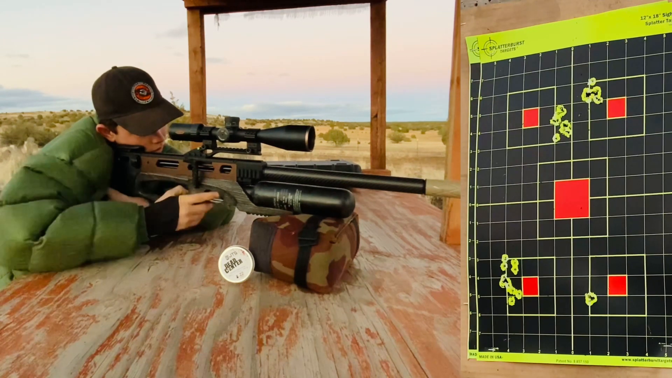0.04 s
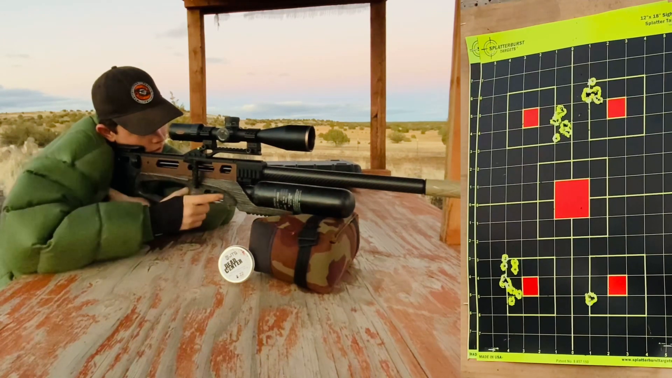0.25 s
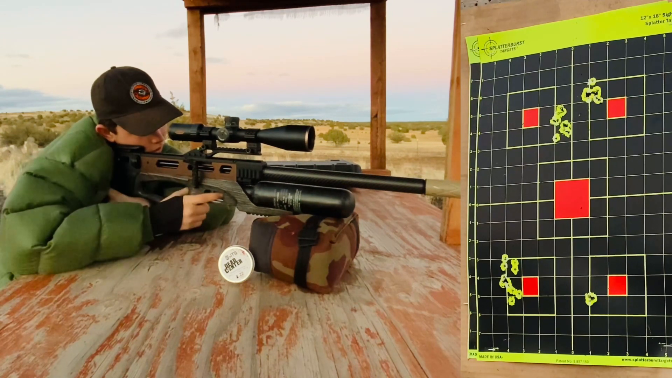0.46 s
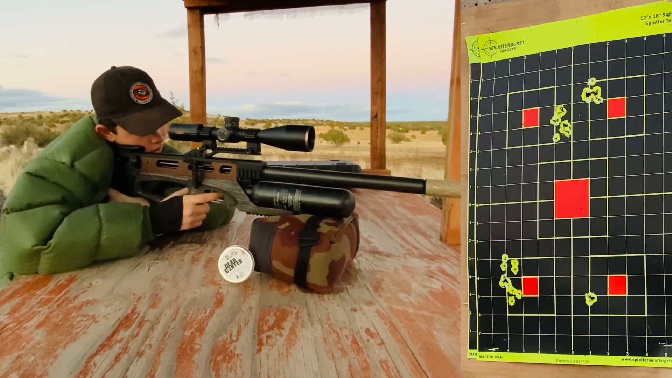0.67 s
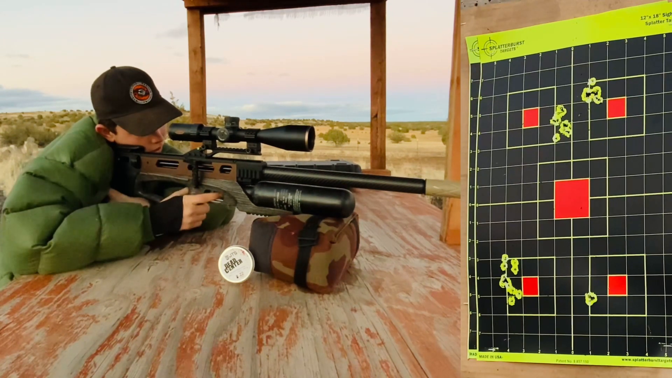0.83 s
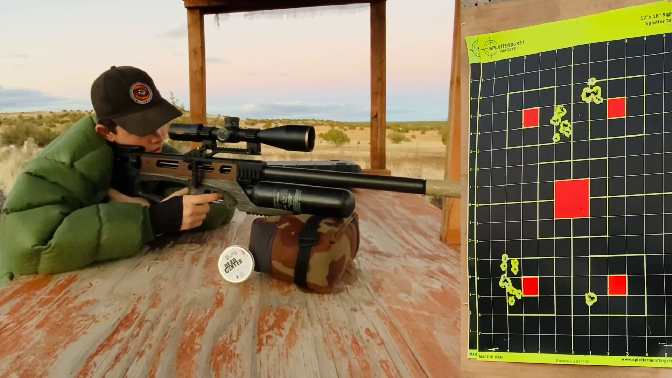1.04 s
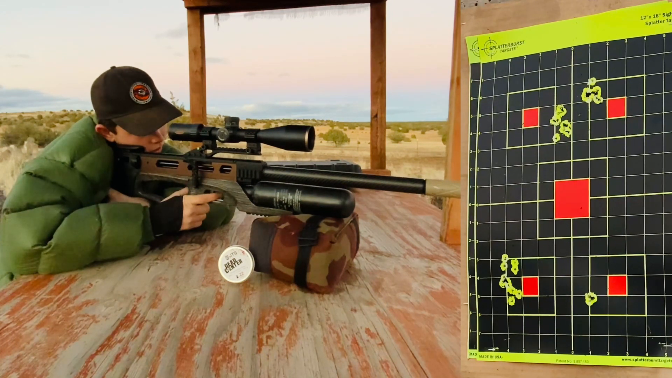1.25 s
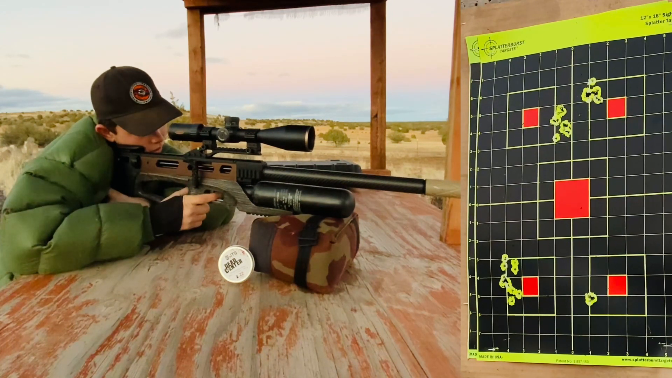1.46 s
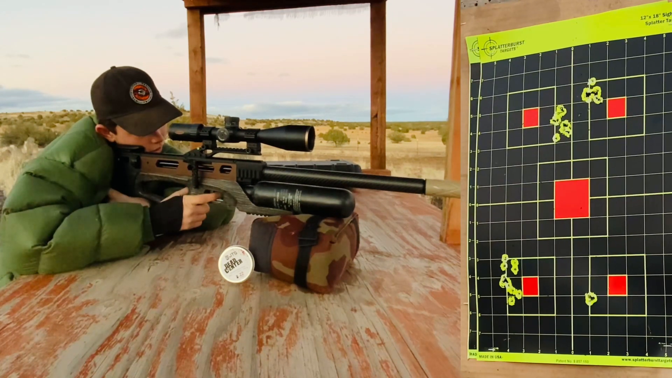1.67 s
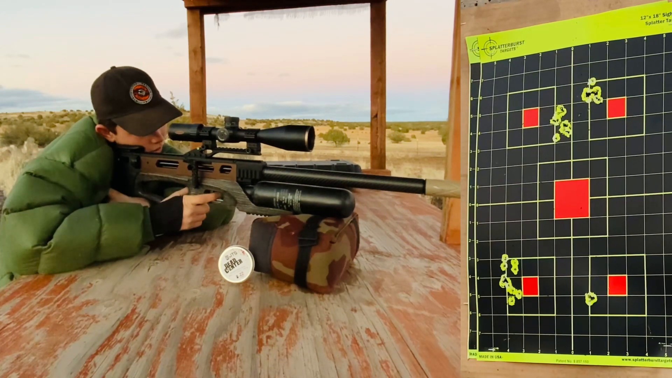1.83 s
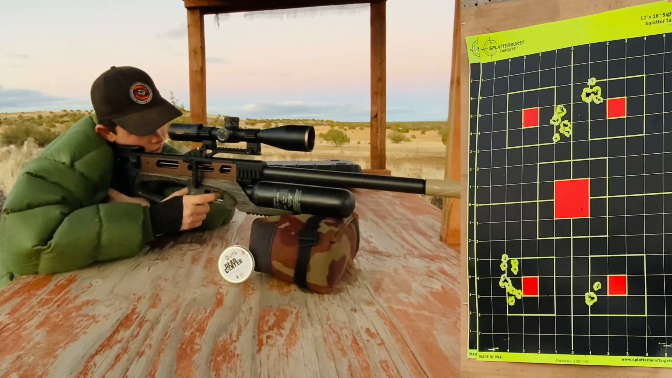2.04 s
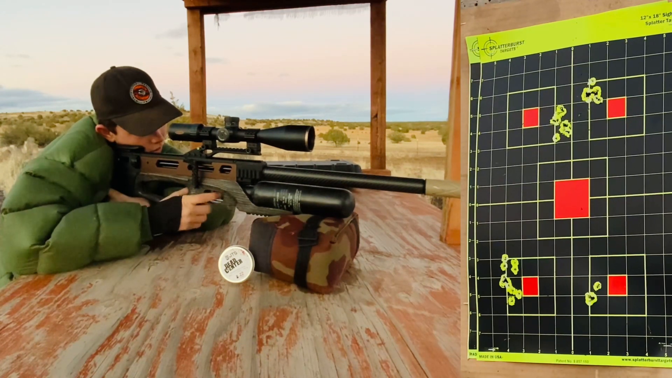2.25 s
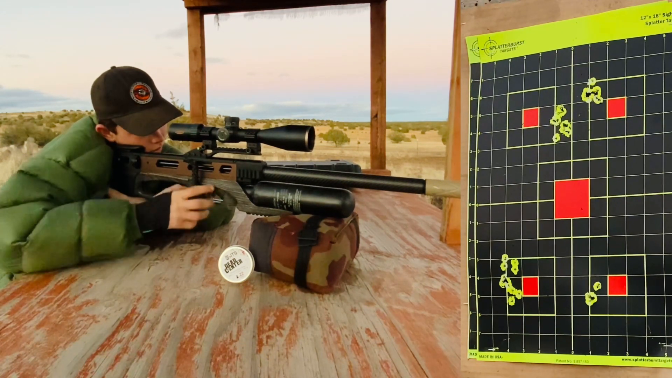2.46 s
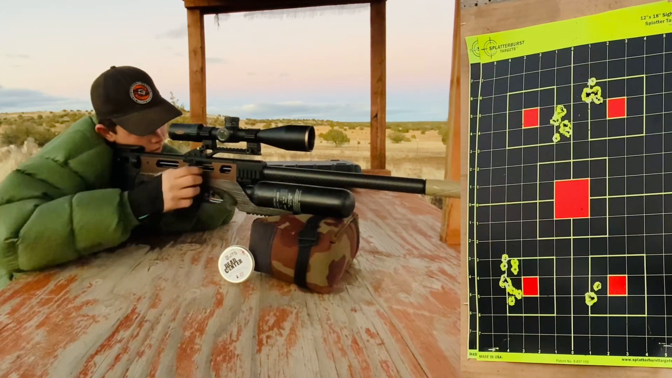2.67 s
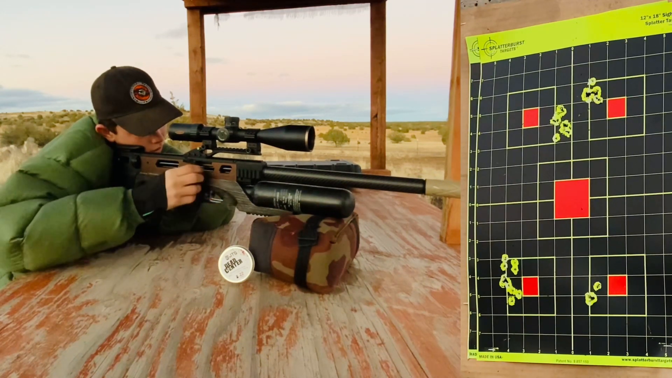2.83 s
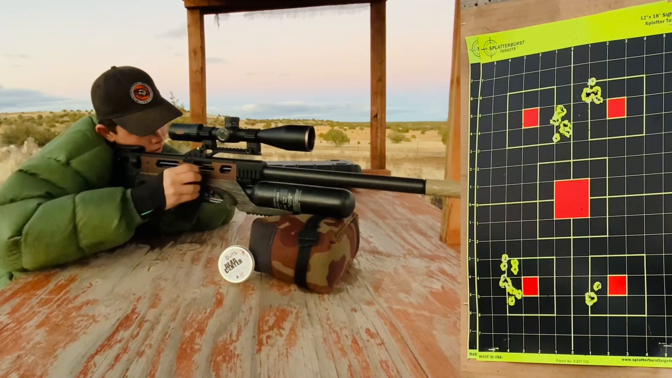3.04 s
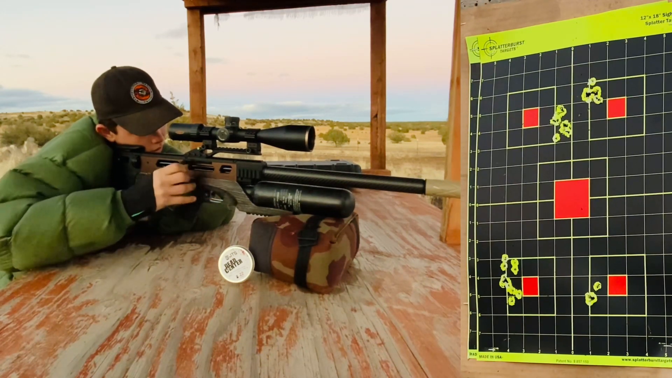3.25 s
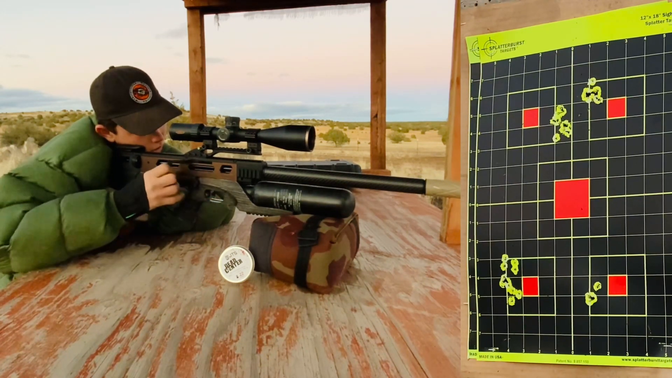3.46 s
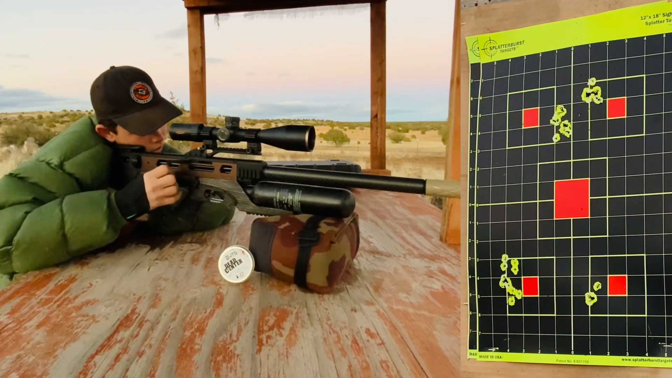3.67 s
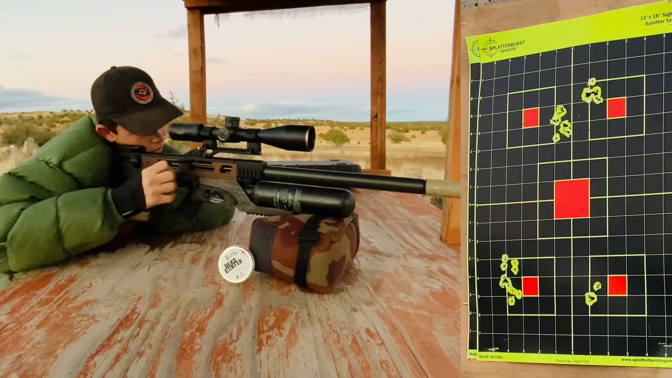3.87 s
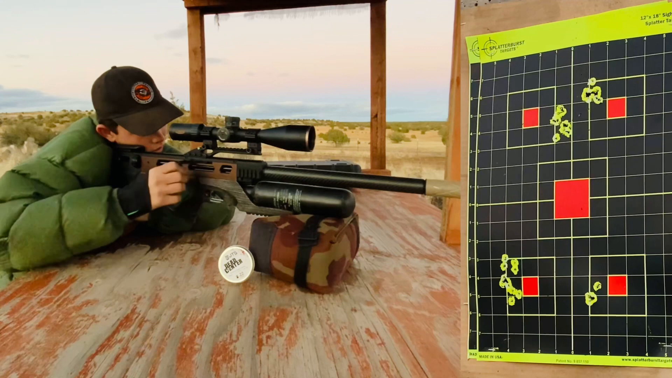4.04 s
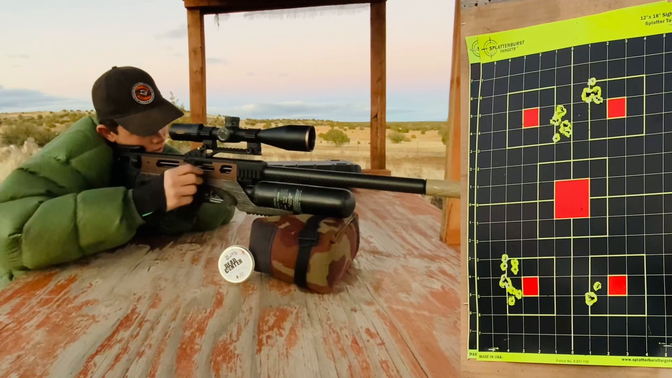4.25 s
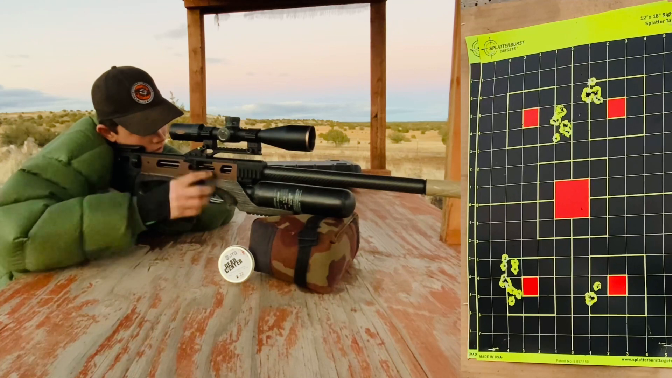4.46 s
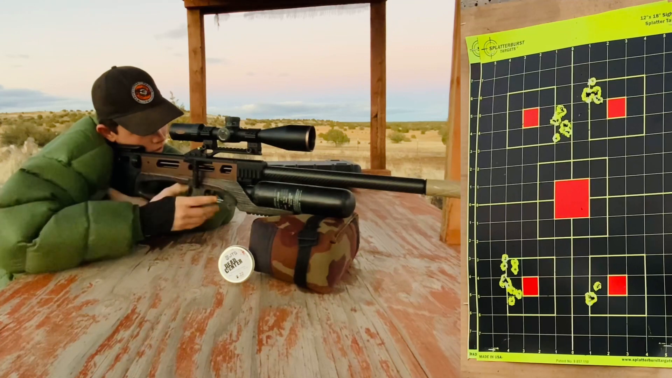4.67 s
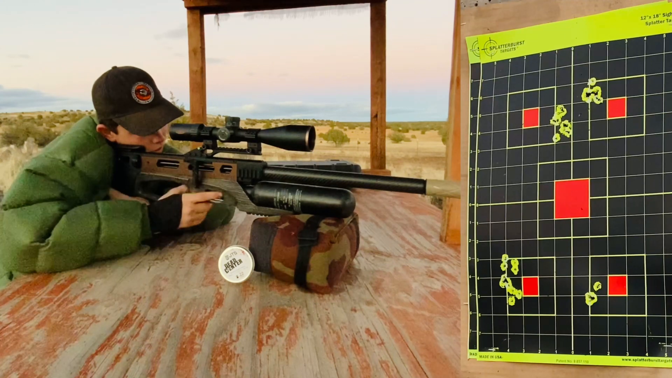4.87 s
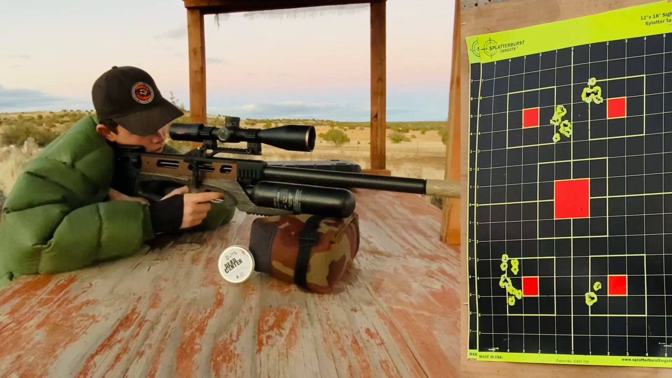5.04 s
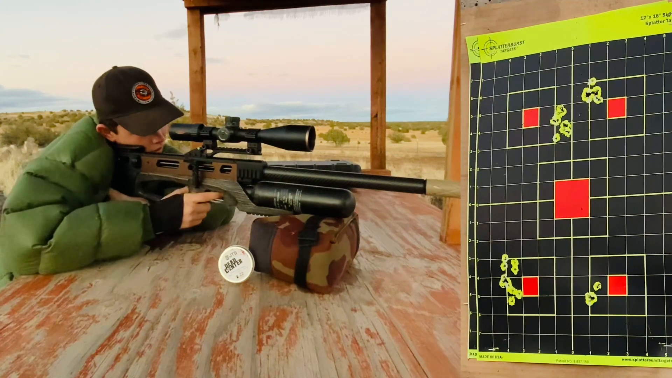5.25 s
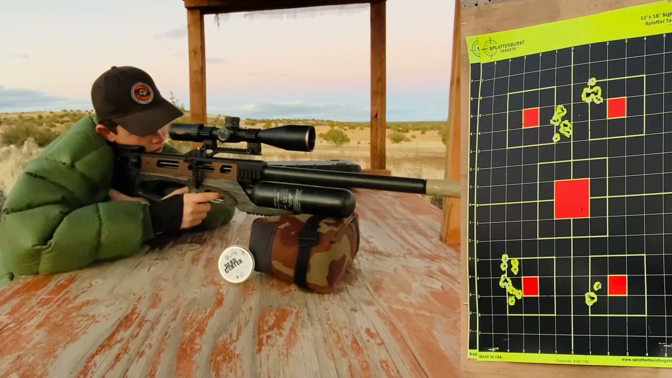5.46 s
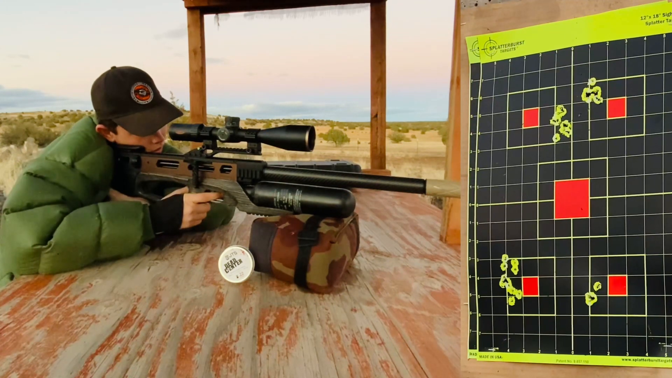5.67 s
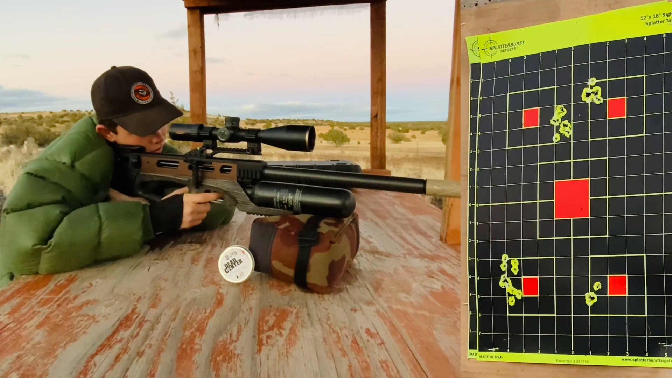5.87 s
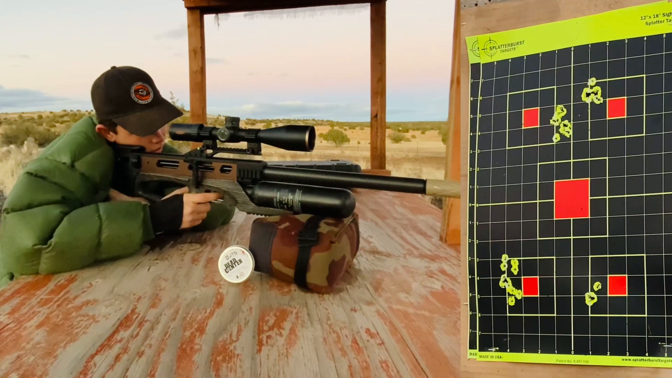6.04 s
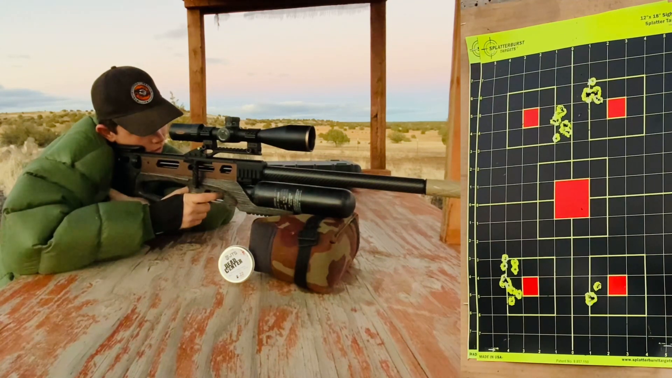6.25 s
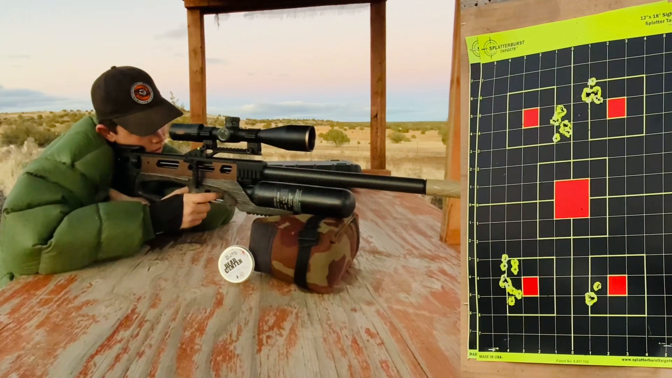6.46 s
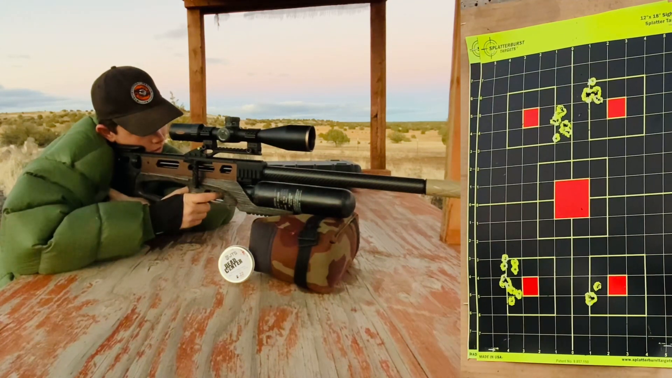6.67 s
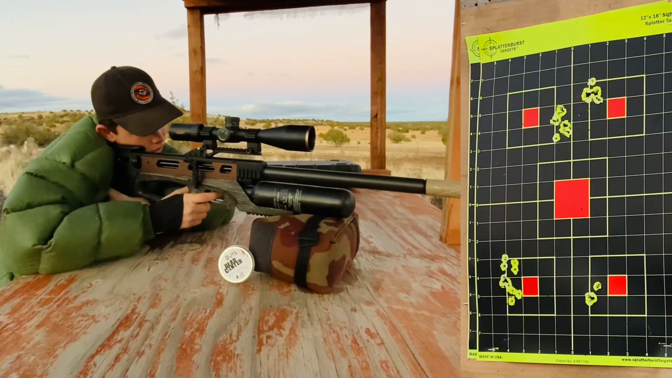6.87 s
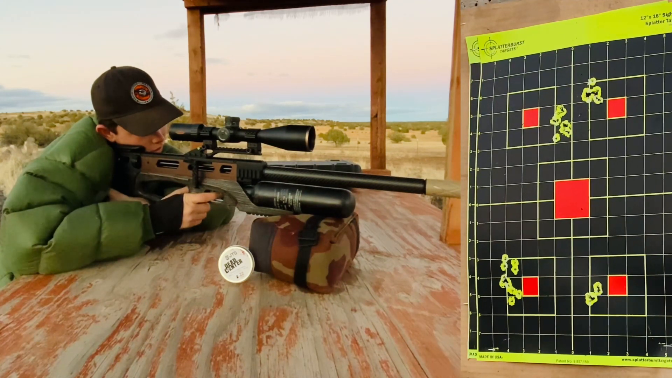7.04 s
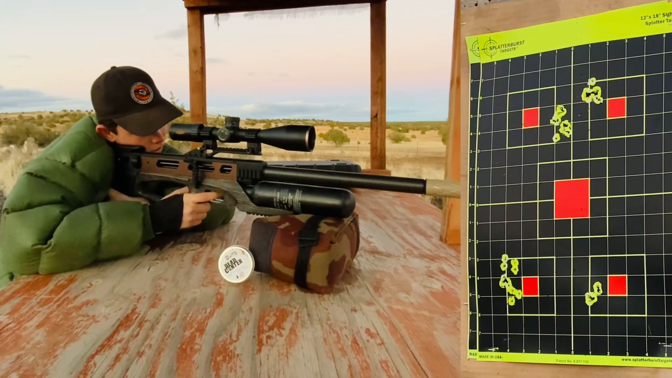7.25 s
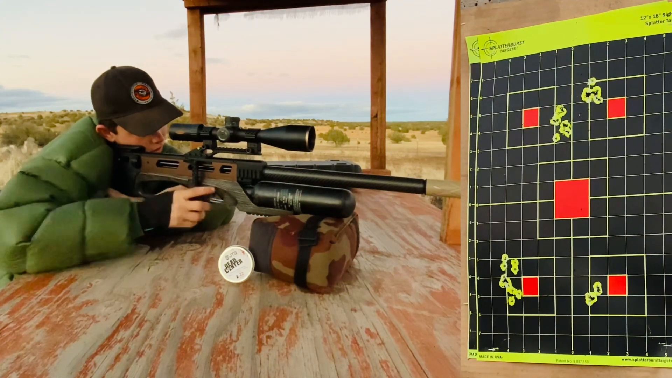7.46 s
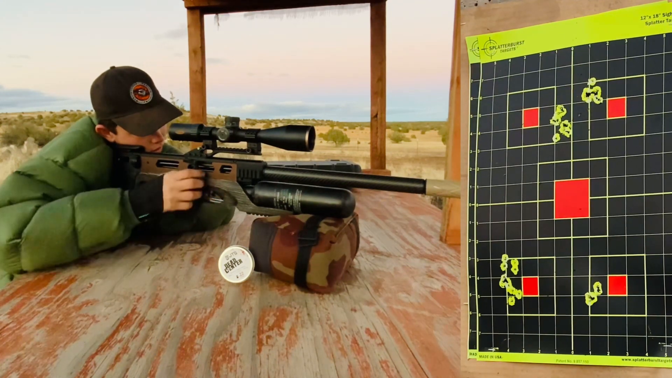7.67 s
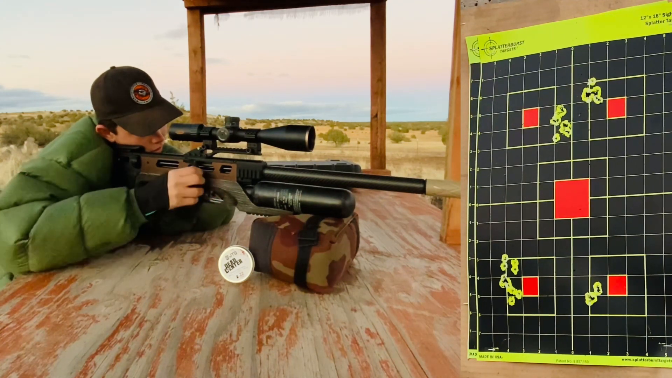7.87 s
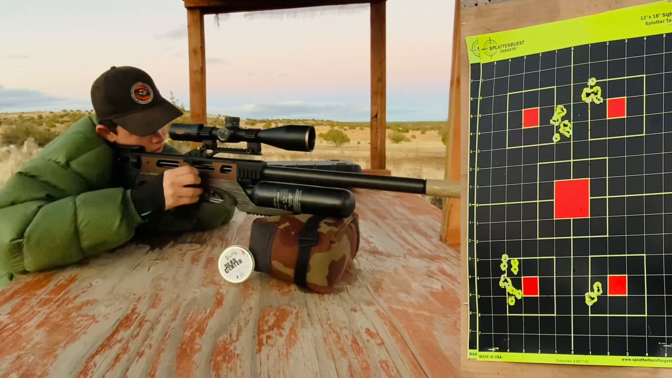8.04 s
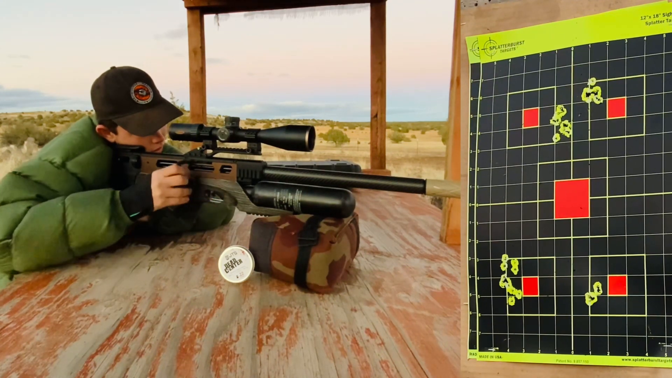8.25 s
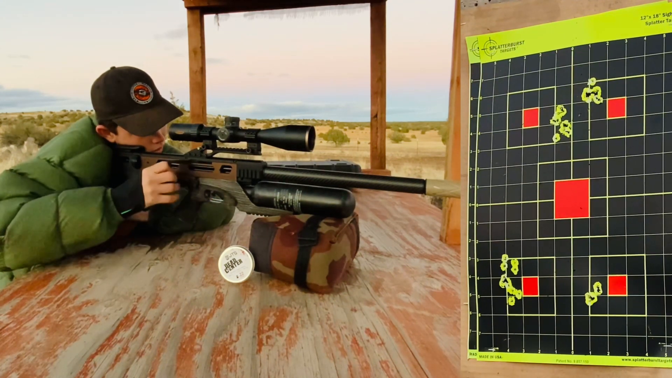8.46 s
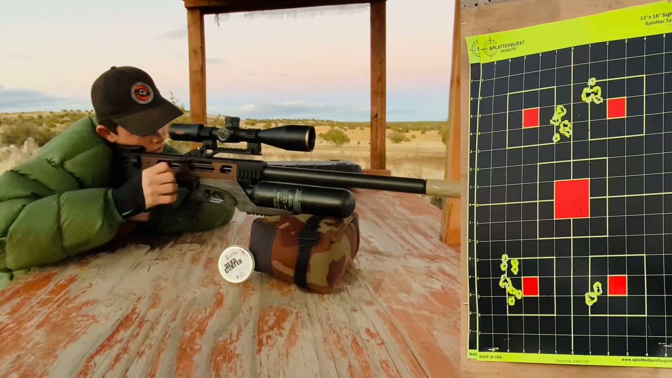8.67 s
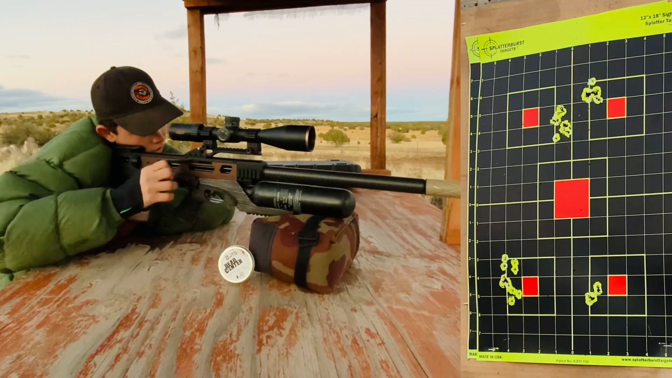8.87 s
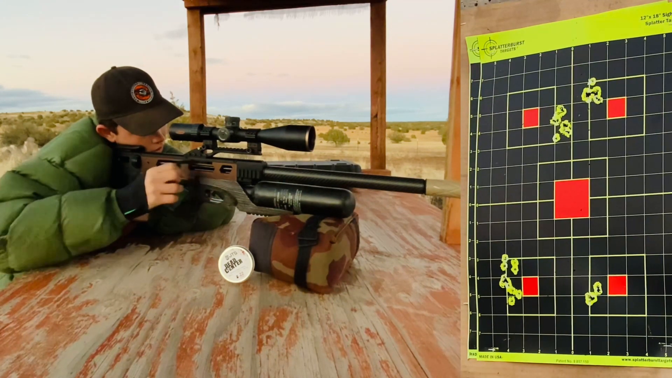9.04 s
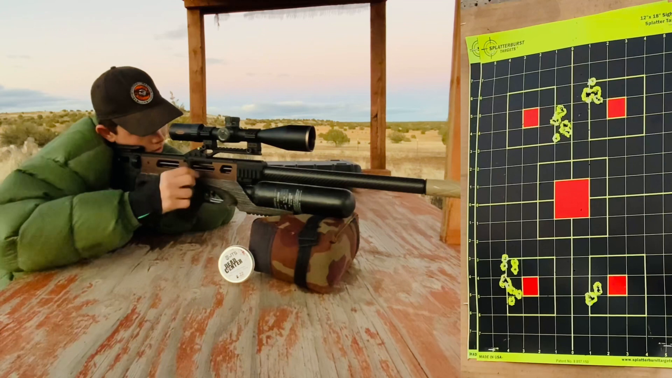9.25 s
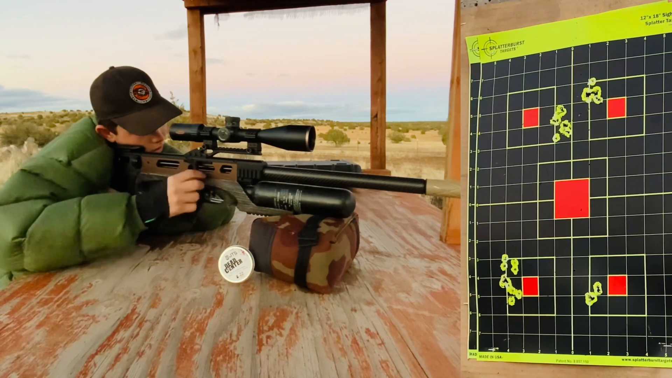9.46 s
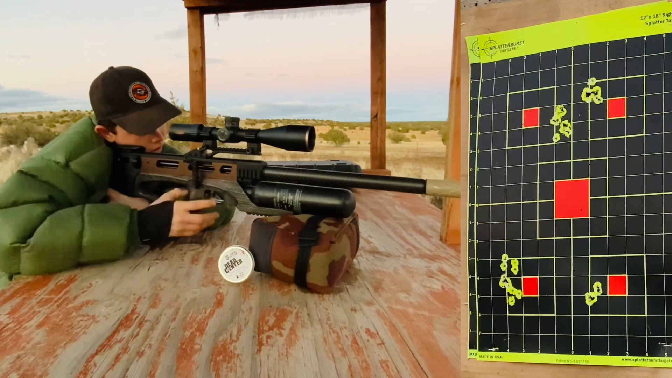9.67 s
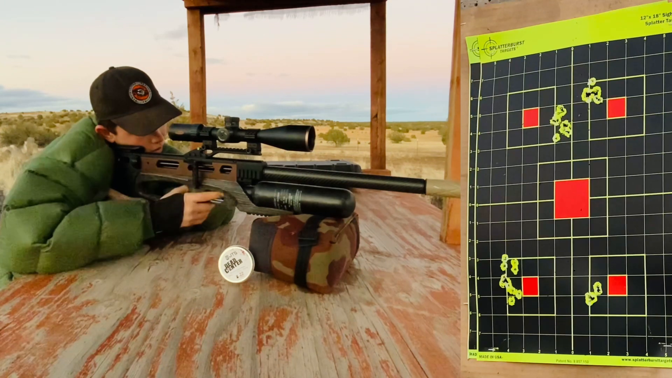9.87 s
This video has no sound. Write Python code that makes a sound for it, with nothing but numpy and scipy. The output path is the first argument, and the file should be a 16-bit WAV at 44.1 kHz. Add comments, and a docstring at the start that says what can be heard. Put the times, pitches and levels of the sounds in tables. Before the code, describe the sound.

Two sharp, suppressed air rifle shots outdoors, each followed by a pellet smacking a ringing target, then steel lever clicks and faint jacket rustle.

```python
"""A suppressed air rifle fires twice from a wooden bench outdoors: swelling noise for the escaping air,
resonant noise for the barrel, a falling sine for the thump. The range echoes faintly; the pellet whizzes and
0.3 s after the shot smacks the target (noise), ringing its metal stand (decaying sines). After each shot the
side lever is drawn and closed with small steel clicks; a padded jacket rustles (both shaped noise) over a
low rumble."""
import sys
import numpy as np
from scipy.fft import rfft, irfft, next_fast_len
from scipy.io import wavfile
from scipy.ndimage import map_coordinates

SR = 44100
rng = np.random.default_rng(int(sys.argv[2]) if len(sys.argv) > 2 else 0)


def unload_wav(signal):
    """Save mono or channel-first audio to the path in sys.argv[1] as 16-bit WAV at rate SR, clipped to [-1, 1]."""
    wavfile.write(
        sys.argv[1],
        SR,
        np.round(np.clip(np.atleast_2d(signal).T, -1, 1) * 32767).astype(np.int16),
    )


N = 437031
HIT = np.arange(SR) / SR - .15  # s, time axis of one event, 0 at its peak

# shots: t/s, air level/dB, barrel level/dB, thump delay/s, thump level/dB
SHOTS = [(1.690, -8.5, -4.5, 0.0035, -3.5), (6.73, -5.5, -9.5, .0045, -2)]
# escaping air spectrum: f/Hz, relative level/dB per Hz
AIR_SPECTRUM = [(100, -25), (400, -4), (550, -2), (1100, -3.5), (1700, -2), (2150, -5.5), (3000, 0.5),
                (4500, -4), (7000, -6.5), (9200, -2.5), (10200, -12.5), (15500, -20)]
# barrel and suppressor resonances: f/Hz, width/Hz, relative level/dB
BARREL_MODES = [(752, 52, 5.5), (868, 19, -2), (1575, 26, 3), (1720, 45, 1), (2480, 22, -2.5),
                (3120, 72, -3), (3160, 60, -7), (3811, 94, -5.5), (4940, 30, -1), (8125, 40, -3.5),
                (8100, 590, -4)]


def shots():
    """Air swells through the suppressor, rings the barrel and leaves the muzzle as a thump."""
    out = np.zeros((2, N))
    air_ripple = ripple(depth_db=4.5, spacing_hz=44.56)
    air_colour = lambda hz: shape(AIR_SPECTRUM)(hz) * air_ripple(hz)
    for s, air_db, ring_db, delay_s, thump_db in SHOTS:
        air_swell = swell(rise=.017, t60=.097, tail_db=-25, tail_t60=.23)
        add(out, s, amp(air_db + 1) * noise(air_colour, leftward=.8) * air_swell)
        ring_swell = swell(rise=.012, t60=.085, tail_db=-31.5, tail_t60=.25)
        add(out, s, amp(ring_db + 1) * noise(resonances(BARREL_MODES), leftward=2.5) * ring_swell)
        push = thump(start_hz=437, end_hz=56.5, glide=.0051, attack=.00067, t60=.069)
        knock = thump(start_hz=410, end_hz=258.2, glide=.0036, attack=.001, t60=.043)
        add(out, s + delay_s, amp(thump_db) * ports(push + amp(-8) * knock, lead=.00038))
    return out


# pellet strikes: snap t/s, snap level/dB, smack delay/s, smack level/dB, board knock level/dB,
# thump level/dB, thump start f/Hz, ring level/dB
STRIKES = [(1.9745, -15.5, .0205, -11.5, 2.5, -15.5, 380, -27), (7.015, -15, .0203, -11, -3, -11, 240, -29)]
# first snap spectrum: f/Hz, relative level/dB per Hz
SNAP_SPECTRUM = [(200, -10.5), (1000, -18.5), (2000, -14), (3000, -4.5), (4300, -5.5), (6500, 0.5),
                 (9300, -2.5), (10800, -19), (15000, -22.5)]
# smack spectrum: f/Hz, relative level/dB per Hz
SMACK_SPECTRUM = [(100, -12), (300, 0.5), (550, -3), (900, -7.5), (1800, -7.5), (3500, -2), (5500, 2.5),
                  (8000, -4), (11000, -0.5), (12000, -11.5), (13600, -0.5), (15000, -4.5), (16000, -21)]
# metal stand modes: f/Hz, relative level/dB, t60/s
STAND_MODES = [(640, -15, 0.5), (1030, -19, 0.75), (1502, -10.5, 0.28), (1614, -5, 0.44), (1795, -11, 0.45),
               (2010, -10, 0.55), (2210, -2, 0.4), (2540, -15, 0.36), (2650, -15, 0.4), (2996, -6.5, .16),
               (3441, -16.5, 0.27), (3904, -17.5, .3), (4231, -13.5, .22), (5889, -6, 0.099)]


def target():
    """The pellet snaps, then smacks the board; the metal stand rings on."""
    out = np.zeros((2, N))
    t = np.maximum(HIT, 0)
    smack_ripple = ripple(depth_db=7, spacing_hz=35)
    snap = shape(SNAP_SPECTRUM)
    for s, snap_db, delay_s, smack_db, knock_db, thump_db, thump_hz, ring_db in STRIKES:
        # how hollow the board sounds depends on where it is struck
        hollow = shape([(800, knock_db), (1500, 0)])
        smack = lambda hz: shape(SMACK_SPECTRUM)(hz) * smack_ripple(hz) * hollow(hz)
        add(out, s, amp(snap_db + .5) * noise(snap, leftward=-.24) * swell(rise=.009, t60=.16))
        smack_swell = swell(rise=.0042, t60=.074, tail_db=-3, tail_t60=.11)
        add(out, s + delay_s, amp(smack_db) * noise(smack, leftward=.1) * smack_swell)
        # each blow has a sharp crack
        add(out, s, amp(snap_db - .5) * noise(snap, leftward=0) * swell(rise=.0005, t60=.0045))
        smack_crack = noise(smack, leftward=0) * swell(rise=.0005, t60=.008)
        add(out, s + delay_s - .0037, amp(smack_db - .5) * smack_crack)
        push = thump(start_hz=thump_hz, end_hz=64.4, glide=.005, attack=.001, t60=.08)
        add(out, s + delay_s + .00046, amp(thump_db) * push)
        ring = 0
        for hz, db, t60 in STAND_MODES:
            # the loose stand shakes, which blurs each mode a little
            phase = rng.normal(0, 1.0, (2, 1)) + .55 * wobble(45)
            mode_db = db + rng.normal(0, 2.0, (2, 1)) - 60 * t / t60
            ring = ring + amp(mode_db) * np.sin(2 * np.pi * hz * t + phase)
        add(out, s + delay_s, amp(ring_db) * ring * (1 - np.exp(-t / .003)))
    return out


# lever and bolt contacts: reload stage, t/s, relative level/dB, then tint of knock, treble, fizz/dB (relative)
CLICKS = [("grip", 3.046, -48.5, -14, 0, -22), ("open", 3.3789, -22.5, -19, -8.5, -30),
          ("draw", 3.4448, -14, -22, -9.5, -33), ("cock", 3.483, -14.5, -18, -10.5, -38),
          ("push", 3.934, -27, -23, -6, -31), ("feed", 3.978, -32.5, -13.5, -14, -33),
          ("seat", 4.0455, -40, -25, -33, -45), ("lock", 4.2814, -21.5, -12.5, -22, -44.5),
          ("open", 8.3569, -26, -19, -10.5, -37), ("draw", 8.429, -18, -12.5, -7.5, -36),
          ("cock", 8.4473, -13.5, -14.5, -14, -35), ("push", 8.9658, -30.5, -25, -10.5, -33),
          ("feed", 8.976, -27, -15, -8, -38.5), ("seat", 9.0711, -35, -11.5, -47, -42),
          ("lock", 9.3748, -21.5, -13.5, -20, -36)]
# action spectrum: f/Hz, relative level/dB per Hz
ACTION_SPECTRUM = [(150, -7), (400, 0.5), (1200, -5), (3000, -2), (4500, -3), (6800, -10), (8500, 0.5),
                   (10200, -3.5), (11500, -15), (15500, -26)]
# receiver resonances: f/Hz, width/Hz, relative level/dB
RECEIVER_MODES = [(820, 110, -3.5), (1587, 58, -0.5), (2410, 79, -2.5), (3136, 74, -2.5), (5330, 240, -2.5),
                  (7755, 760, -0.5), (9520, 410, 9)]
# lever slides, in every reload: stage, t after contact/s, level/dB, 60 dB rise/s, t60/s
SLIDES = [("open", -.02, -52, .24, .37), ("draw", -.015, -46.5, .2, .28), ("push", -.005, -52.5, .14, .28),
          ("push", .026, -45.5, .05, .19), ("seat", .005, -52, .4, .38), ("lock", -.008, -51, .11, .22)]
# scrape spectrum: f/Hz, relative level/dB per Hz
SCRAPE_SPECTRUM = [(150, -4), (450, 1), (1000, -2.5), (1500, -4.5), (3000, 0), (4500, -6.5), (6500, -23),
                   (8700, -13.5), (11000, -31.5), (15500, -35.5)]


def lever():
    """The lever scrapes along its guide; steel contacts ring the receiver, each with its own tint."""
    out = np.zeros((2, N))
    click_ripple = ripple(depth_db=7.5, spacing_hz=70.16)
    for _, s, db, knock_db, treble_db, fizz_db in CLICKS:
        tint = shape([(900, knock_db + 11), (2000, 0), (4500, 0), (8000, treble_db + 6.5),
                      (10200, treble_db - 3.5), (12000, fizz_db + 25.5)])
        body = lambda hz: 1 + 1.95 * resonances(RECEIVER_MODES)(hz)
        colour = lambda hz: shape(ACTION_SPECTRUM)(hz) * tint(hz) * click_ripple(hz) * body(hz)
        click_swell = swell(rise=.0092, t60=.0314, tail_db=-11.5, tail_t60=.13)
        add(out, s + .002, amp(db - 6.5) * noise(colour, leftward=1.0) * click_swell)
    for stage, delay_s, db, rise_s, t60 in SLIDES:
        for s in contacts(stage):
            grit = amp(2.65 * wobble(350) + 1.2 * wobble(70))  # tiny slips roughen the scrape
            scrape_ripple = ripple(depth_db=3.5, spacing_hz=149.3)
            scrape = noise(lambda hz: shape(SCRAPE_SPECTRUM)(hz) * scrape_ripple(hz), leftward=.9)
            fade = amp(-60 * np.abs(HIT) / np.where(HIT < 0, rise_s, t60))
            add(out, s + delay_s, amp(db) * grit * scrape * fade)
    return out


def contacts(stage):
    """Times at which the lever reaches this stage."""
    return [s for name, s, *_ in CLICKS if name == stage]


# hand ticks and knocks on the stock: t/s, level/dB, f/Hz
TAPS = [(.112, -57, 3400), (2.262, -58, 3800), (2.313, -44.5, 750), (2.622, -58.5, 442), (4.508, -57, 487),
        (5.518, -67, 3200), (5.823, -62, 803), (7.491, -48, 420), (7.509, -48, 350), (9.29, -63, 3214)]
# firm lever stops rock the rifle on the bench: stage, t after contact/s, level/dB, f/Hz
BUMPS = [("cock", .028, -37, 108), ("seat", .018, -42, 98), ("lock", .07, -43.5, 74)]
RECOIL_DELAY_S, RECOIL_DB, RECOIL_HZ = .075, -40, 86


def handling():
    """Hands tap the stock; recoil and the lever's firm stops bump the rifle on the bench: noise bands."""
    out = np.zeros((2, N))
    for s, db, hz in TAPS:
        add(out, s, amp(db) * noise(band(hz, width=.67)) * swell(rise=.0051, t60=.055))
    bumps = [(s + delay_s, db, hz) for stage, delay_s, db, hz in BUMPS for s in contacts(stage)]
    bumps += [(s + RECOIL_DELAY_S, RECOIL_DB, RECOIL_HZ) for s, *_ in SHOTS]
    for s, db, hz in bumps:
        add(out, s, amp(db) * noise(band(hz, width=.84)) * swell(rise=.04, t60=.3))
    return out


# sleeve strokes: start t/s, length/s, relative level/dB
SLEEVES = [(0.0, .02, -60), (.13, .12, -63.5), (2.29, .06, -57.5), (2.4, .03, -66), (2.78, .02, -76),
           (2.91, .02, -76), (3.072, .01, -66), (3.72, .1, -68), (4.14, .26, -74), (4.56, .12, -61),
           (4.77, .14, -61), (7.29, .14, -63.5), (7.61, .04, -64.5), (7.74, .1, -73), (8.03, .2, -70.5),
           (8.26, .06, -66), (8.78, .03, -71), (9.54, .12, -60.5), (9.76, .15, -59)]
# rustle noise band levels, with a narrow gap near 6 kHz: f/Hz, relative level/dB per Hz
RUSTLE_BANDS = [(120, -18), (220, 0.5), (420, 0), (630, 1), (900, -6.5), (1250, -5), (1700, -15),
                (2700, -11), (4400, -18), (6300, -40), (8500, -18.5), (11000, -36.5), (15500, -42)]
SLEEVE_RISE_DB_PER_S, SLEEVE_FALL_DB_PER_S = 300, 165


def jacket():
    """Each stroke of a padded sleeve builds, holds and fades as noise, creasing unevenly."""
    out = np.zeros((2, N))
    for s, length_s, db in SLEEVES:
        rise_db = SLEEVE_RISE_DB_PER_S * np.minimum(HIT, 0)
        fall_db = SLEEVE_FALL_DB_PER_S * np.maximum(HIT - length_s, 0)
        rustle_ripple = ripple(depth_db=4.5, spacing_hz=122)
        creases_db = 2.06 * wobble(25) + 1.32 * wobble(200)
        rustle = noise(lambda hz: shape(RUSTLE_BANDS)(hz) * rustle_ripple(hz), leftward=1.0)
        add(out, s, amp(db + 4.0 + rise_db - fall_db + creases_db) * rustle)
    return out


# two echoes, then the pellet's whizz just before it strikes: delay/s, level/dB, centre f/Hz, rise/s, t60/s
ECHOES_AND_WHIZZ = [(.136, -38.5, 4800, .005, .13), (.172, -41.5, 3300, .016, .16),
                    (.264, -33.5, 3120, .006, .25)]
RATTLE_DELAY_S, RATTLE_DB, RATTLE_HZ = .089, -37.5, 1850  # once after each smack


def echoes_whizz_and_rattle():
    """Noise bands: two echoes of each shot, the pellet's whizz, and the stand's rattle after each smack."""
    out = np.zeros((2, N))
    dull = shape([(9500, 0), (11000, -16)])
    for s, *_ in SHOTS:
        for delay_s, db, hz, rise_s, t60 in ECHOES_AND_WHIZZ:
            rush = noise(lambda f: band(hz, width=.8)(f) * dull(f), leftward=.47)
            add(out, s + delay_s, amp(db) * rush * swell(rise=rise_s, t60=t60))
    for s, _, delay_s, *_ in STRIKES:
        rattle = noise(band(RATTLE_HZ, width=.6), leftward=.47)
        add(out, s + delay_s + RATTLE_DELAY_S, amp(RATTLE_DB) * rattle * swell(rise=.033, t60=.2))
    return out


# range return, body: f/Hz, relative level/dB per Hz
RANGE_BODY = [(100, 0), (300, -3.5), (900, -3), (1650, -0.5), (2400, -10), (4000, -15), (6500, -28.5),
              (15500, -50)]
# range return, treble: f/Hz, relative level/dB per Hz
RANGE_TREBLE = [(1500, -19.5), (3200, -1.5), (4500, -3.5), (6500, -7), (9000, -3), (10500, -23),
                (15500, -32)]


def open_range():
    """Ground and scrub scatter shots and strikes back as noise; a shot's treble fades first."""
    out = np.zeros((2, N))
    treble = shape(RANGE_TREBLE)
    for s, *_ in SHOTS:
        body_gain = amp(-46 + 1.3 * wobble(60))
        add(out, s + .098, body_gain * noise(shape(RANGE_BODY), leftward=1.2) * swell(rise=.05, t60=1.41))
        treble_gain = amp(-51 + 1.8 * wobble(80))
        add(out, s + .069, treble_gain * noise(treble, leftward=.7) * swell(rise=.05, t60=1.0))
    for s, *_ in STRIKES:
        add(out, s + .09, amp(-48.5) * noise(treble, leftward=.4) * swell(rise=.05, t60=.42))
    return out


# low rumble spectrum: f/Hz, relative level/dB per Hz
RUMBLE_SPECTRUM = [(15, -21.5), (30, -16), (50, -6), (70, 0.5), (100, -5), (130, -3.5), (165, -15),
                   (230, -16), (320, -30.5), (600, -40), (1500, -80.5)]
# still air spectrum: f/Hz, relative level/dB per Hz
STILL_AIR_SPECTRUM = [(100, 2.5), (700, 1), (1500, -5), (4000, -7), (6500, -10), (9000, -7), (11000, -10.5),
                      (15500, -7.5)]
REST_DB = -64.7
# roll after a shot: dB relative to the air level; rise is over 60 dB
ROLL_DB, ROLL_DELAY_S, ROLL_RISE_S, ROLL_T60_S = -38.5, .13, .1, 3.4
# weight shift with each sleeve stroke
SHIFT_DB, SHIFT_DB_PER_STROKE_DB, SHIFT_FADE_DB_PER_S, FIRM_STROKE_DB = -56.5, .36, 30, -60


def surroundings():
    """Wavering low rumble over faint still air; rolls on after each shot, swells as the shooter moves."""
    levels_db = []
    for s, air_db, *_ in SHOTS:
        roll_db = held(s + ROLL_DELAY_S, 0, 60 / ROLL_RISE_S, 60 / ROLL_T60_S)
        levels_db.append(air_db + ROLL_DB + roll_db)
    for s, length_s, db in SLEEVES:
        shift_db = SHIFT_DB + SHIFT_DB_PER_STROKE_DB * (db - FIRM_STROKE_DB)
        levels_db.append(shift_db + held(s, length_s, SHIFT_FADE_DB_PER_S, SHIFT_FADE_DB_PER_S))
    strength = np.hypot(amp(REST_DB), amp(np.max(levels_db, axis=0)))
    waver = amp(1.8 * wobble(12, size=N))
    rumble = strength * waver * ports(noise(shape(RUMBLE_SPECTRUM), size=N, leftward=0), lead=-.00025)
    return rumble + amp(-76) * noise(shape(STILL_AIR_SPECTRUM), size=N, leftward=0)


def held(start, length, rise_db_per_s, fall_db_per_s):
    """Level in dB of a movement that builds up, holds and dies away."""
    t = np.arange(N) / SR - start
    return rise_db_per_s * np.minimum(t, 0) - fall_db_per_s * np.maximum(t - length, 0)


# left minus right at leftward=1: f/Hz, level/dB
LEFTWARD = [(150, -.5), (350, 1.5), (650, 7), (1100, 8.5), (2000, 5), (4000, 3.5), (8000, 1.5)]
# left-right correlation before the side gain and lead: f/Hz, correlation [-]
ALIKE = [(50, 1), (150, 0.97), (450, 1), (1000, .6), (2000, .35), (8000, .25)]


def noise(colour, size=SR, leftward=1.0):
    """Coloured stereo noise of rms 1; leftward scales the level and phase lead of the left port."""
    m = next_fast_len(size)
    hz = np.fft.rfftfreq(m, 1 / SR)
    common, apart = np.exp(2j * np.pi * rng.random((2, len(hz)))) * colour(hz)
    turn = np.arccos(np.clip(along(ALIKE, hz), -1, 1)) / 2
    pair = np.cos(turn) * common + np.sin(turn) * np.array([apart, -apart])
    lead_rad = along([(170, .05), (1000, 1.5), (8000, .7)], hz)
    side = (amp(along(LEFTWARD, hz) / 2) * np.exp(.5j * lead_rad)) ** leftward
    return unit(irfft(pair * np.array([side, 1 / side]), m)[:, :size])


def ports(sound, lead):
    """The sound at two microphone ports, reaching the left one lead seconds earlier."""
    m = next_fast_len(sound.shape[-1])
    turn = np.exp(1j * np.pi * lead * np.fft.rfftfreq(m, 1 / SR))
    return irfft(rfft(sound, m) * np.array([turn, 1 / turn]), m)[:, :sound.shape[-1]]


def thump(start_hz, end_hz, glide, attack, t60):
    """A low push whose pitch sinks as it dies; glide and attack are time constants in s."""
    t = np.maximum(HIT, 0)
    cycles = end_hz * t + (start_hz - end_hz) * glide * (1 - np.exp(-t / glide))
    return -np.sin(2 * np.pi * cycles) * (1 - np.exp(-t / attack)) * amp(-60 * t / t60)


def swell(rise, t60, tail_db=-120, tail_t60=.3):
    """Grow from nothing in rise seconds, then die with t60 s over a tail of its own level and t60."""
    fall = amp(-60 * np.abs(HIT) / t60) + amp(tail_db - 60 * np.abs(HIT) / tail_t60)
    return np.where(HIT < 0, np.clip(1 + HIT / rise, 0, 1) ** 2, fall)


def resonances(modes):
    """Gain against frequency for (f/Hz, width/Hz, level/dB) resonances, summed in power."""
    def gain(f):
        powers = (np.abs(amp(db) * f * w / (c * c - f * f + 1j * f * w)) ** 2 for c, w, db in modes)
        return np.sqrt(sum(powers))
    return gain


def band(hz, width):
    """Squared gain of one resonance, for steep skirts; width before squaring is a share of its centre."""
    return lambda f: resonances([(hz, width * hz, 0)])(f) ** 2


def ripple(depth_db, spacing_hz):
    """Random uneven gain against frequency, drawn afresh per call, roughening the noise."""
    knots = rng.standard_normal(4096)

    def gain(hz):
        curve = map_coordinates(knots, [hz / spacing_hz], mode="wrap")
        return amp(depth_db * np.tanh(curve))
    return gain


def wobble(rate, size=SR):
    """A smooth random curve, rate knots a second."""
    knots = rng.standard_normal(int(size * rate / SR) + 4)
    return map_coordinates(knots, [np.arange(size) * rate / SR])


def shape(points):
    """Gain against frequency for (f/Hz, level/dB) points."""
    return lambda hz: amp(along(points, hz))


def along(points, hz):
    """Interpolate (f/Hz, value) points on a log axis."""
    f, v = np.transpose(points)
    return np.interp(np.log(hz + 1), np.log(f + 1), v)


def amp(db):
    """Decibels to gain."""
    return 10 ** (np.asarray(db) / 20)


def unit(x):
    """Scale to rms 1."""
    return x / np.sqrt(np.mean(x ** 2) + 1e-20)


def add(track, s, sound):
    """Mix a sound into the track with its HIT = 0 at s seconds, cropped to the track."""
    start = round((s + HIT[0]) * SR)
    sound = sound[..., max(-start, 0):]
    part = track[:, max(start, 0):][:, :sound.shape[-1]]
    part += sound[..., :part.shape[1]]


def scene():
    """Rifle, target, range, shooter and surroundings together."""
    rifle = shots() + lever() + handling()
    downrange = target() + echoes_whizz_and_rattle() + open_range()
    return rifle + downrange + jacket() + surroundings()


TOP_HZ = 15700


def record(dry):
    """Clip overloads at 0.95, then cut steeply above the band limit."""
    m = next_fast_len(N + SR // 2)
    clipped = np.clip(dry, -.95, .95)
    passband = 1 / np.sqrt(1 + (np.fft.rfftfreq(m, 1 / SR) / TOP_HZ) ** 200)
    return irfft(rfft(clipped, m) * passband, m)[:, :N]


dry = scene()
out = record(dry)
unload_wav(out)
```